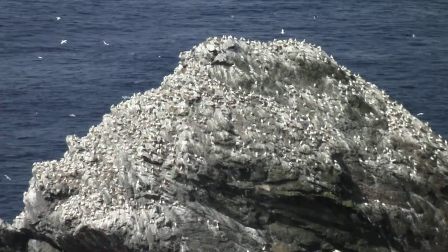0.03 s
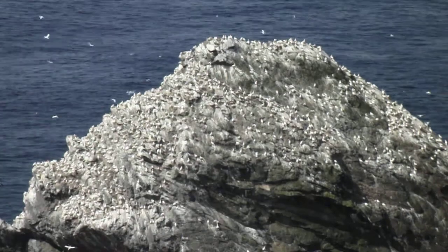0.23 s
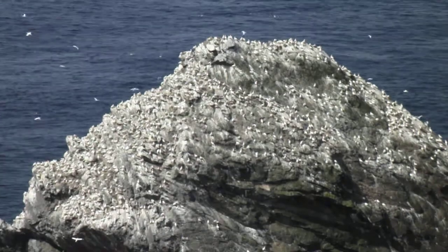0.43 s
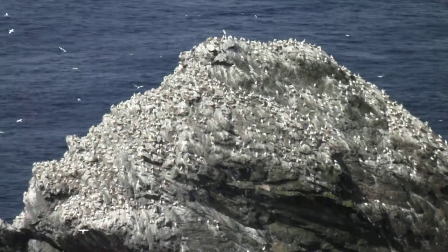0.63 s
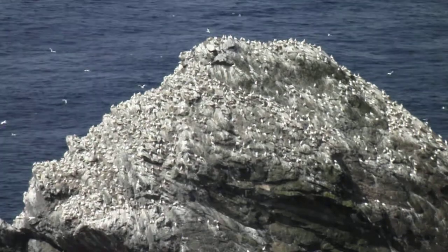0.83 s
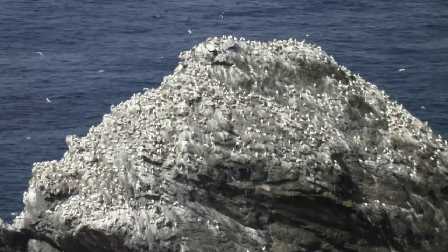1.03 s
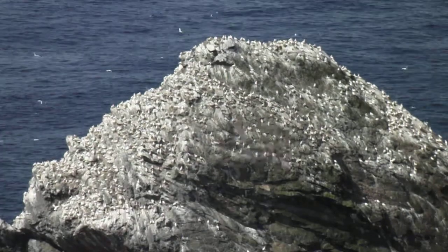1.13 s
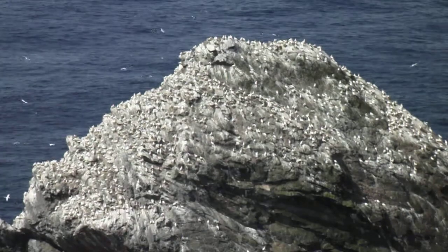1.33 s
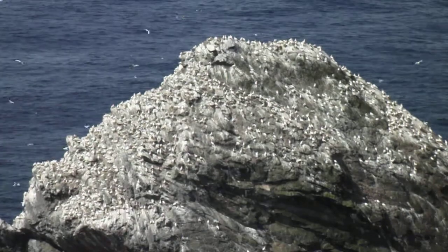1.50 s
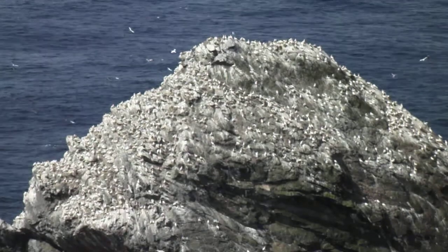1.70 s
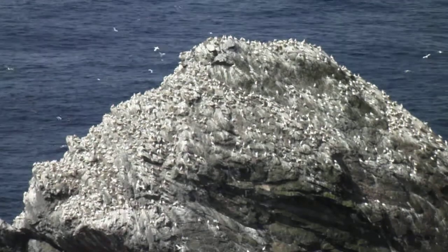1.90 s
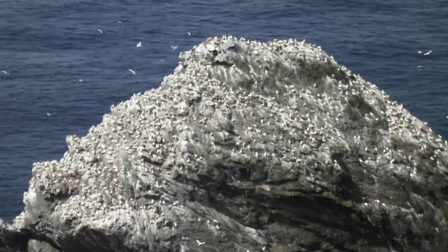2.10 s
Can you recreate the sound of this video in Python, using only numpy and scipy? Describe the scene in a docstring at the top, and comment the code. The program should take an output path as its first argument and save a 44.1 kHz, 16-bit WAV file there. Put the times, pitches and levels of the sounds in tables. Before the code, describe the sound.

Hundreds of far seabirds on a sea rock cackle in a steady mid-pitched babble; wind rumbles and jolts the exposed single-channel microphone outdoors, soft rustles and ticks come close by, and waves wash faintly beneath.

```python
"""From the outset a far colony of seabirds chatters: pulse trains in throat resonances over a blur of noise.
Under it run the wash of the sea, as patchy filtered noise, and the very soft sine tones of a camera.
Gusts at once begin to buffet the microphone: low noise of evened size, with brief jolts from 0.2 s on.
Close by, decaying rings tick faintly from 0.07 s and bursts of noise rustle from 0.11 s.
From 0.2 s single birds stand out in short notes, sines roughened by noise."""
import sys
import numpy as np
from scipy import signal
from scipy.fft import rfft, irfft, next_fast_len
from scipy.io import wavfile
from scipy.ndimage import uniform_filter1d

SR = 44100
rng = np.random.default_rng(int(sys.argv[2]) if len(sys.argv) > 2 else 0)


def convert_level_to_amplitude(level_db):
    """Map a level in decibels to its linear amplitude factor."""
    exponent = np.asarray(level_db, float) / 20
    return 10 ** exponent


def persist_wave(psi):
    """Save psi, clipped to +-1, as 16-bit WAV."""
    counts = np.round(np.clip(psi, -1, 1) * 32767).astype(np.int16)
    wavfile.write(sys.argv[1], SR, np.atleast_2d(counts).T)


N = 94815
T = np.arange(N) / SR  # time, s

# Colony loudness: [t/s, level/dB]
CHATTER_LEVEL = [(0, -40), (.1, -42.5), (.19, -43), (.28, -42), (.37, -39.5), (.41, -43), (.5, -41.5),
                 (.6, -40.5), (.65, -44), (.8, -42), (.98, -42.5), (1.1, -41), (1.2, -43), (1.32, -44),
                 (1.44, -42), (1.55, -43), (1.65, -43.5), (1.76, -43), (1.86, -44), (1.92, -40.5),
                 (2.03, -43.5), (2.15, -44)]
# Colony spectrum: [f/Hz, relative density/dB per Hz]
COLONY_SPECTRUM = [(1300, -120), (1540, -8), (1680, -0.5), (1850, -1.5), (1990, -2), (2230, 0), (2650, -3),
                   (3150, 0.5), (3270, -2), (3600, -7.5), (4000, -14.5), (5000, -25.5), (6500, -42),
                   (11000, -120)]
# Throat resonances: [f/Hz, bandwidth/Hz]
THROATS = [(1480, 720), (2200, 1800), (2800, 400), (3200, 1200)]
CALLS_PER_S = 130
PULSE_HZ, PULSE_SPREAD = 260.7, .3  # central pulse rate, its scatter either way as a log ratio
SYLLABLE_S = 0.085  # mean length
CALL_SCATTER_DB = 6  # scatter of call sizes either way
RASP_DB, PIP_DB = -3.5, -15.5  # over the blur, before the colony spectrum is imposed
PIPS_PER_S, PIP_S = 260, 0.0277  # rate, mean length
PIP_LOW_HZ, PIP_HIGH_HZ = 1295, 3413  # range of starting pitches
PIP_BEND = 0.0623  # largest relative phase bend; the pitch glides by up to twice this
# Drone loudness near 1.5 kHz: [t/s, level/dB]
DRONE_LEVEL = [(0.0, -48.5), (0.15, -45), (0.27, -48.5), (0.3, -45), (0.55, -46.5), (0.61, -42.5),
               (0.64, -53), (0.68, -50.5), (0.72, -43.5), (0.79, -50), (0.89, -51), (0.94, -46.5),
               (0.98, -47.5), (1.16, -48), (1.17, -42.5), (1.28, -47.5), (1.36, -45), (1.39, -52),
               (1.44, -47.5), (1.56, -44.5), (1.65, -51), (1.69, -43.5), (1.74, -50.5), (1.77, -43),
               (1.8, -51.5), (1.87, -43), (1.9, -48.5), (2.15, -50.5)]
# Drone spectrum: [f/Hz, relative density/dB per Hz]
DRONE_SPECTRUM = [(530, -34), (900, -45), (990, -7.5), (1180, -13), (1380, -2), (1490, 4), (1520, 3),
                  (1570, -10), (1640, -16), (1800, -120)]
DRONE_EVENNESS = .35  # how far the drone keeps a steady size, 0-1

# Spectrum of the wash of the waves: [f/Hz, relative density/dB per Hz]
SEA_SPECTRUM = [(71, -25), (120, -2.5), (286, -8.5), (855, -12), (993, -12), (1190, -16), (1300, -11.5),
                (1690, -37), (2860, -120)]
# Spectrum of the hiss above it: [f/Hz, relative density/dB per Hz]
HISS_SPECTRUM = [(2650, -40), (4500, -5), (5300, -5.5), (6300, -4), (6500, -6.5), (7400, -5), (7700, 0),
                 (8300, 0), (8550, -3.5), (9000, -2), (9700, -2), (10000, -6.5), (12000, -9), (15100, -9),
                 (16000, -13.5)]
SEA_DB, HISS_DB = -48.5, -58.5  # rms levels

# Harmonics of the whine: [multiple of the fundamental, rms level/dB]
WHINE_HARMONICS = [(7, -70), (19, -84), (20, -84), (22, -80), (23, -84), (24, -83)]
# Lone camera tone: [f/Hz, rms level/dB]
LONE_TONE = [(11472, -73)]
WHINE_HZ = 401.06

# Wind on the membrane: [t/s, thud level/dB, flutter level/dB]
BUFFET_LEVELS = [(0.0, -57, -61), (0.02, -31.5, -44.5), (0.13, -26, -50), (0.17, -30.5, -45),
                 (0.21, -34, -24), (0.24, -17.5, -38.5), (0.27, -42, -43), (0.29, -20, -31),
                 (0.35, -20.5, -36), (0.39, -27, -46), (0.42, -29, -50), (0.46, -16, -32),
                 (0.49, -28, -25.5), (0.51, -24, -21), (0.54, -11, -47), (0.57, -21, -64),
                 (0.6, -20.5, -26), (0.65, -30.5, -71), (0.69, -25, -31), (0.74, -34.5, -34),
                 (0.76, -13, -37), (0.81, -9.5, -22.5), (0.84, -16.5, -24), (0.87, -9.5, -31),
                 (0.89, -6.5, -25), (0.91, -23.5, -31), (0.93, -19, -46), (0.99, -30.5, -23),
                 (1.02, -7, -20.5), (1.05, -30, -18.5), (1.07, -15.5, -40), (1.1, -16, -32),
                 (1.12, -14.5, -44), (1.15, -33, -26), (1.17, -20, -34), (1.23, -17, -23),
                 (1.3, -31.5, -58), (1.33, -39, -45), (1.41, -18, -32.5), (1.44, -21, -48),
                 (1.45, -39, -44), (1.48, -17.5, -52), (1.52, -33, -53), (1.57, -18.5, -24.5),
                 (1.62, -22.5, -59), (1.66, -32, -40.5), (1.69, -18, -43), (1.8, -37, -44),
                 (1.84, -23.5, -46), (1.87, -26, -46), (1.89, -20.5, -42.5), (1.95, -34, -35.5),
                 (2.0, -35.5, -54), (2.04, -33, -52), (2.08, -37.5, -45), (2.15, -42, -49)]
# Thud spectrum: [f/Hz, relative density/dB per Hz]
THUD_SPECTRUM = [(4.7, 7.5), (8.0, 7), (22, -3), (32, 3), (45, -10.5), (70, -26), (91, -41), (150, -120)]
# Flutter spectrum: [f/Hz, relative density/dB per Hz]
FLUTTER_SPECTRUM = [(32, -79), (55, -2), (73, -4.5), (145, -29), (300, -37), (390, -64), (660, -120)]
# Sudden jolts of the membrane: [middle t/s, peak level/dB, width/s]
JOLTS = [(.208, -21, 0.012), (.502, -19, 0.0057), (.893, -13.5, 0.0084), (1.026, -12, 0.016),
         (1.56, -18.5, 0.012)]
WIND_EVENNESS = .85  # how far thuds and flutter keep a steady size, 0-1
THUD_TOP_HZ, FLUTTER_TOP_HZ, LOW_CORNER_HZ = 48, 200, 10

# Ticks: [t/s, main-ring level before rise and decay/dB, f/Hz, share of the duller rings 0-1]
TICKS = [(0.073, -41, 8320, .5), (1.0733, -40, 8500, .05), (1.0775, -47, 9000, .05), (1.5506, -37, 8040, 1),
         (1.5556, -39.5, 7700, 1), (1.5596, -43, 7800, .5)]
# Rustles: [start t/s, length/s, level/dB]
RUSTLES = [(0.11, 0.052, -59), (0.163, 0.032, -58), (0.303, 0.096, -58.5), (0.432, 0.052, -56),
           (.536, .02, -53.5), (0.743, 0.035, -57), (0.882, 0.024, -58), (0.936, 0.017, -59)]
# Spectrum of rustles and of the crack in ticks: [f/Hz, relative density/dB per Hz]
RUSTLE_SPECTRUM = [(3500, -120), (4500, -0.5), (6200, 2), (7200, -16), (7900, 10), (8400, 6.5),
                   (9500, -2.5), (11000, -120)]
TICK_T60_S, TICK_RISE_S = 0.0085, .0005  # 60 dB decay time, rise time constant
TICK_LOW_HZ, TICK_MID_HZ, TICK_TOP_HZ = 4250, 6790, 9900
TICK_LOW, TICK_MID, TICK_TOP, TICK_CRACK = 1, 0.55, .25, 0.4  # gains relative to the main ring

# Single notes that stand out: [middle t/s, tone level/dB, f/Hz, length/s, hoarseness 0-1]
NOTES = [(.225, -44, 2100, .03, .5), (.273, -42, 2550, .022, .4), (.285, -43, 1850, .016, .3),
         (.291, -40, 3230, .012, .4), (.311, -42, 2550, .014, .6), (.326, -42, 2870, .016, .4),
         (.334, -41, 1420, .02, .3), (.338, -38, 3200, .024, .6), (.338, -42, 1900, .02, .4),
         (.344, -40, 1500, .014, .3), (.367, -39, 2380, .014, .5), (.367, -39, 3200, .012, .5),
         (.379, -42, 3200, .014, .4), (.41, -42, 1480, .022, .3), (.505, -41, 1800, .018, .5),
         (.551, -42, 2300, .018, .5), (1.131, -33, 3190, .018, .35), (1.2, -42, 3170, .03, .5),
         (1.39, -38, 2760, .022, .3), (1.445, -43, 1500, .022, .3), (1.454, -35, 2700, .007, .8),
         (1.458, -41, 3150, .008, .7), (1.657, -39, 2310, .034, .35), (1.674, -35, 2200, .016, .35),
         (1.679, -41, 1950, .01, .6), (1.742, -39, 2580, .018, .5), (1.745, -35, 2300, .02, .4),
         (1.766, -38, 1500, .014, .3), (1.772, -41, 2300, .02, .4), (1.79, -41, 3300, .022, .4)]
ROUGH_HZ = 220  # how far hoarseness smears a note


def unit(x):
    """Normalisation: scales a signal to rms 1."""
    return x / np.sqrt(np.mean(x ** 2) + 1e-20)


def curves(rows):
    """Linear interpolation: one value per sample for each column after the time."""
    t, *columns = np.transpose(rows)
    return [np.interp(T, t, column) for column in columns]


def filtered(x, response):
    """Linear filtering: multiplies the spectrum by a response of frequency."""
    size = next_fast_len(N + SR // 2)
    return irfft(rfft(x, size) * response(np.fft.rfftfreq(size, 1 / SR)), size)[:N]


def coloured(x, points):
    """Spectral shaping: applies (Hz, dB) points on a log-frequency axis, then brings the rms to 1."""
    f, db = np.transpose(points)
    return unit(filtered(x, lambda hz: convert_level_to_amplitude(np.interp(np.log(hz + 1), np.log(f + 1), db))))


def evened(x, floor, evenness):
    """Envelope compression: divides a signal by a power of its Hilbert envelope."""
    return x / (np.abs(signal.hilbert(x)) + floor) ** evenness


def patchy(patchy_db):
    """Random modulation: white noise whose gain wanders in patches of time and frequency."""
    spectrum = signal.stft(rng.standard_normal(N), nperseg=512)[2]
    field = uniform_filter1d(rng.standard_normal(spectrum.shape), size=5, axis=0)
    field = uniform_filter1d(field, size=6, axis=1)
    return signal.istft(spectrum * convert_level_to_amplitude(patchy_db * unit(field)), nperseg=512)[1][:N]


def hump(start, length):
    """Sine-squared window: a smooth swell from start lasting length."""
    return np.sin(np.pi * np.clip((T - start) / length, 0, 1)) ** 2


def resonance(f, centre, width):
    """Damped resonator: response of one throat, 1 at its centre frequency."""
    return 1j * f * width / (centre * centre - f * f + 1j * f * width)


def rasps():
    """Source and filter: jittered pulse trains excite throat resonances, whose summed response is then levelled."""
    total = np.zeros(N)
    for centre, width in THROATS:
        u = rng.random((round(CALLS_PER_S * N / SR / len(THROATS)), 4))
        k = np.arange(48)
        gap = 1 / (PULSE_HZ * np.exp(PULSE_SPREAD * (2 * u[:, 1:2] - 1)))
        since = gap * (k + .12 * rng.standard_normal((len(u), len(k))))
        length = SYLLABLE_S * (.5 + u[:, 2:3])
        shape = np.sin(np.pi * np.clip(since / length, 0, 1))
        scatter_db = CALL_SCATTER_DB * (2 * u[:, 3:] - 1) + 2 * rng.standard_normal(since.shape)
        size = shape * convert_level_to_amplitude(scatter_db)
        place = ((u[:, :1] * N / SR + since) * SR).astype(int) % N
        pulses = np.bincount(place.ravel(), size.ravel(), N)
        total += unit(filtered(pulses, lambda f: resonance(f, centre, width)))

    def level_out(f):
        power = sum(np.abs(resonance(f, c, w)) ** 2 for c, w in THROATS)
        return 1 / np.sqrt(0.00035 + power)

    return unit(filtered(total, level_out))


def pips():
    """Frequency glide: a dense scatter of small bent sines, whistles of younger or farther birds."""
    u = rng.random((round(PIPS_PER_S * N / SR), 5))
    t = np.arange(round(.06 * SR)) / SR
    length = PIP_S * (.5 + u[:, 1:2])
    hz = PIP_LOW_HZ + (PIP_HIGH_HZ - PIP_LOW_HZ) * u[:, 2:3]
    bend = PIP_BEND * (2 * u[:, 3:4] - 1)
    phase = 2 * np.pi * hz * t * (1 + bend * t / length)
    swell = np.sin(np.pi * np.clip(t / length, 0, 1)) ** 2
    wave = convert_level_to_amplitude(7 * u[:, 4:]) * swell * np.sin(phase)
    place = ((u[:, :1] * N).astype(int) + np.arange(len(t))) % N
    return unit(np.bincount(place.ravel(), wave.ravel(), N))


def colony():
    """Superposition: rasps and pips over the noise blur of all the farther birds, with a drone near 1.5 kHz."""
    rasp = rasps()
    blur = unit(patchy(patchy_db=1.47))
    crowd = blur + convert_level_to_amplitude(RASP_DB) * rasp + convert_level_to_amplitude(PIP_DB) * pips()
    drone = evened(coloured(rng.standard_normal(N), DRONE_SPECTRUM), .3, DRONE_EVENNESS)
    drone = coloured(drone, [(900, -120), (950, 0), (1650, 0), (1800, -120)])  # back into its band
    [level_db], [drone_db] = curves(CHATTER_LEVEL), curves(DRONE_LEVEL)
    return convert_level_to_amplitude(level_db) * coloured(crowd, COLONY_SPECTRUM) + convert_level_to_amplitude(drone_db) * drone


def sea():
    """Filtered noise: the even wash of far waves, and a thin hiss above it."""
    wash = coloured(patchy(patchy_db=1), SEA_SPECTRUM)
    hiss = coloured(patchy(patchy_db=-1.4), HISS_SPECTRUM)
    return convert_level_to_amplitude(SEA_DB) * wash + convert_level_to_amplitude(HISS_DB) * hiss


def camera():
    """Additive synthesis: thin steady sines of the camera's electronics, at random phases."""
    tones = [(k * WHINE_HZ, db) for k, db in WHINE_HARMONICS] + LONE_TONE
    return sum(np.sqrt(2) * convert_level_to_amplitude(db) * np.sin(2 * np.pi * (hz * T + rng.random())) for hz, db in tones)


def wind_push(spectrum, top_hz):
    """Band-limited pressure: noise is twice evened in size and held between two corner frequencies."""
    def band(f):
        return f ** 2 / (f ** 2 + LOW_CORNER_HZ ** 2) / np.sqrt(1 + (f / top_hz) ** 6)

    push = coloured(rng.standard_normal(N), spectrum)
    for _ in range(2):
        push = unit(filtered(evened(push, .2, WIND_EVENNESS), band))
    return push


def jolts():
    """Impulsive displacement: each jolt is a negative pulse between two smaller positive lobes."""
    out = np.zeros(N)
    for middle, db, width in JOLTS:
        u = 2 * (T - middle) / width
        out += convert_level_to_amplitude(db) * (2 * u ** 2 - 1) * np.exp(-u ** 2)
    return out


def buffet():
    """Turbulent pressure: eddies push the membrane in slow thuds, with faster flutter and a few sudden jolts."""
    thud_gain, flutter_gain = [convert_level_to_amplitude(uniform_filter1d(db, size=500)) for db in curves(BUFFET_LEVELS)]
    thuds = thud_gain * wind_push(THUD_SPECTRUM, THUD_TOP_HZ)
    flutter = flutter_gain * wind_push(FLUTTER_SPECTRUM, FLUTTER_TOP_HZ)
    return thuds + flutter + jolts()


def ticks():
    """Damped modes: tiny close ticks, several sines and a noisy crack under one exponential decay."""
    out = np.zeros(N)
    crack = coloured(rng.standard_normal(N), RUSTLE_SPECTRUM)
    for start, db, hz, dull in TICKS:
        t = np.maximum(T - start, 0)
        low = TICK_LOW * np.sin(2 * np.pi * TICK_LOW_HZ * t)
        mid = TICK_MID * np.sin(2 * np.pi * TICK_MID_HZ * t)
        top = TICK_TOP * np.sin(2 * np.pi * TICK_TOP_HZ * t)
        ring = np.sin(2 * np.pi * hz * t) + dull * (low + mid) + top + TICK_CRACK * crack
        out += convert_level_to_amplitude(db - 60 * t / TICK_T60_S) * (1 - np.exp(-t / TICK_RISE_S)) * ring
    return out


def rustles():
    """Gated noise: soft rustles close to the microphone, each a swell of treble noise."""
    swells = sum(convert_level_to_amplitude(db) * np.sqrt(hump(start, length)) for start, length, db in RUSTLES)
    return coloured(rng.standard_normal(N), RUSTLE_SPECTRUM) * swells


def notes():
    """Quadrature modulation: notes of single birds, part steady whistle, part rasp of narrow-band noise."""
    out = np.zeros(N)
    for middle, db, hz, length, hoarse in NOTES:
        in_phase, quadrature = (hoarse / np.sqrt(2) * unit(filtered(row, lambda f: np.exp(-(f / ROUGH_HZ) ** 2)))
                                for row in rng.standard_normal((2, N)))
        steady = np.sqrt(1 - hoarse ** 2)
        angle = 2 * np.pi * hz * T
        tone = (steady + in_phase) * np.sin(angle) + quadrature * np.cos(angle)
        out += convert_level_to_amplitude(db) * hump(middle - length / 2, length) ** .7 * tone
    return out


def scene():
    """Superposition: the sum of all sources as one channel."""
    return (buffet() + colony() + notes() + sea() + rustles() + ticks() + camera())[None]


def band_limit(x):
    """A steep low-pass at the top of the band."""
    return signal.sosfilt(signal.butter(12, 15730, fs=SR, output="sos"), x)


def record(dry):
    """Signal chain: the finished mix passes to its last stage."""
    return band_limit(dry)


dry = scene()
out = record(dry)
persist_wave(out)
```